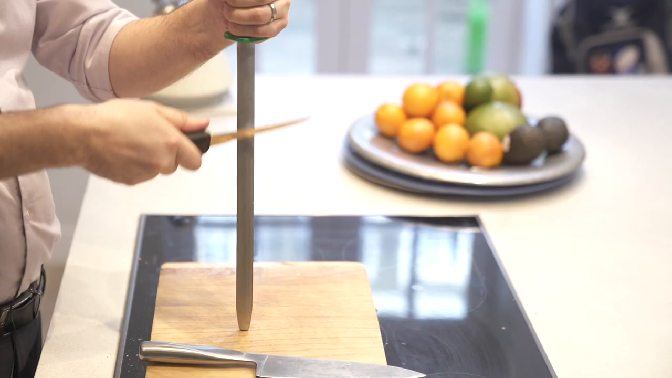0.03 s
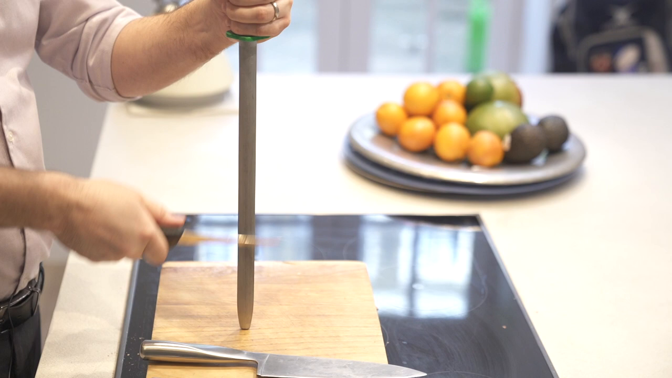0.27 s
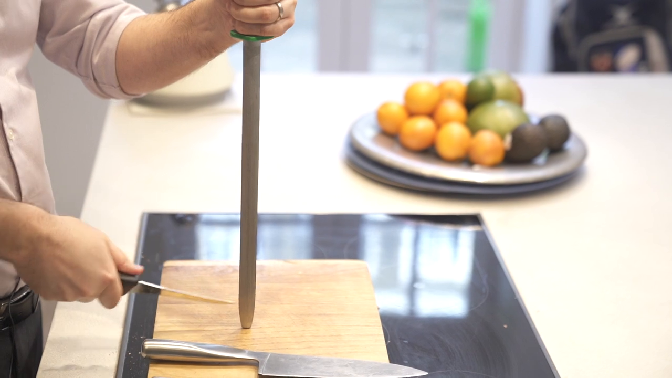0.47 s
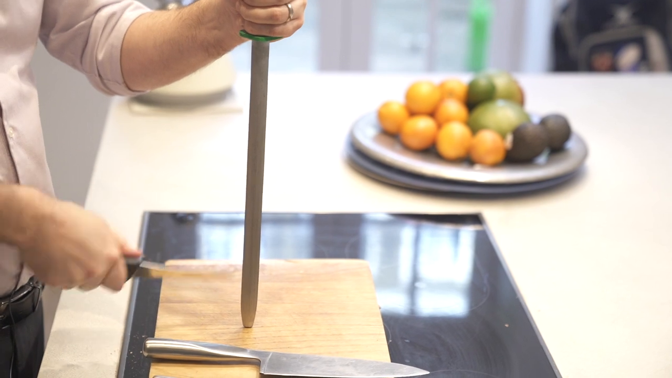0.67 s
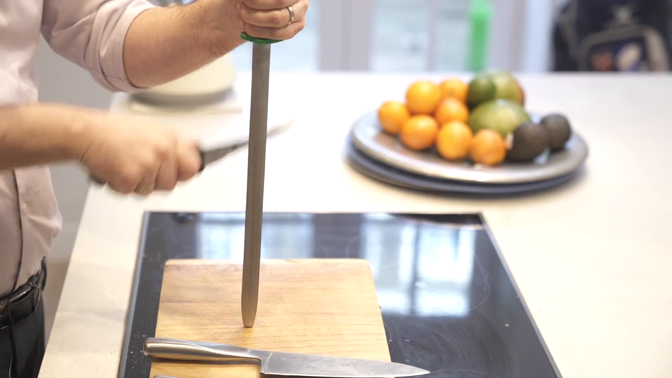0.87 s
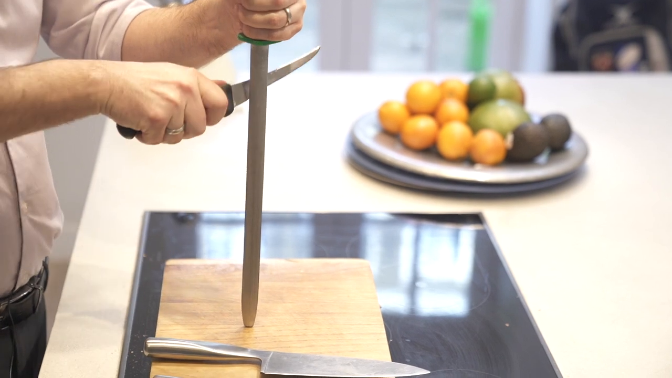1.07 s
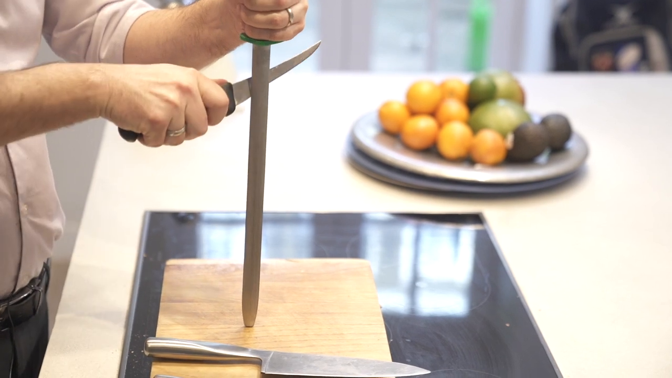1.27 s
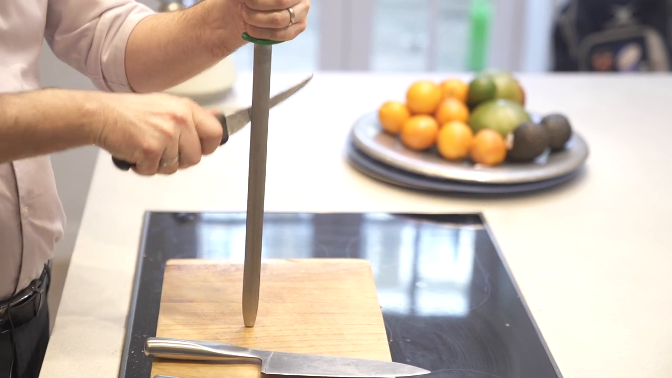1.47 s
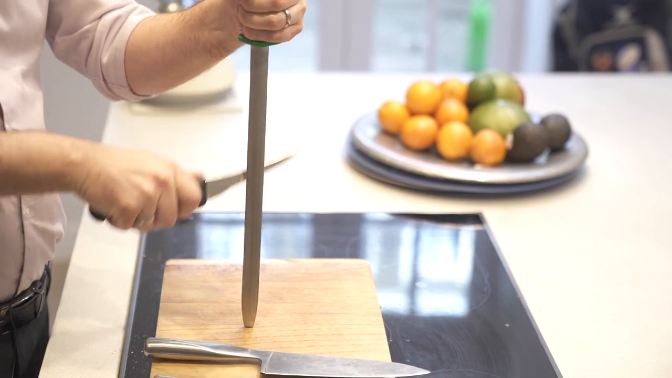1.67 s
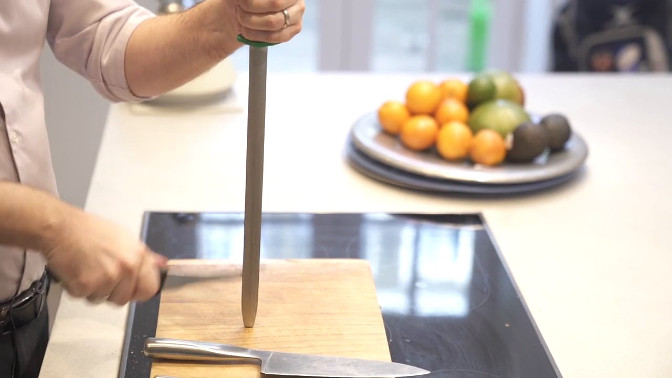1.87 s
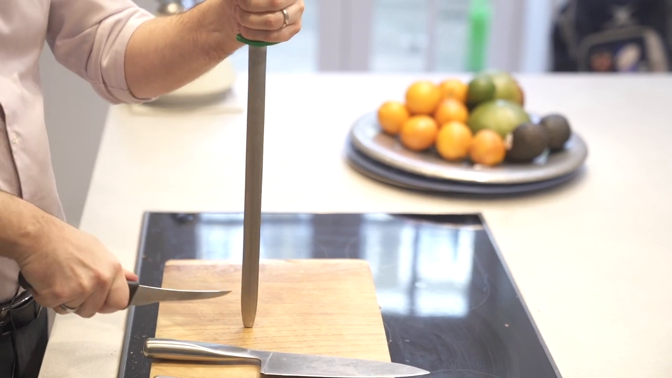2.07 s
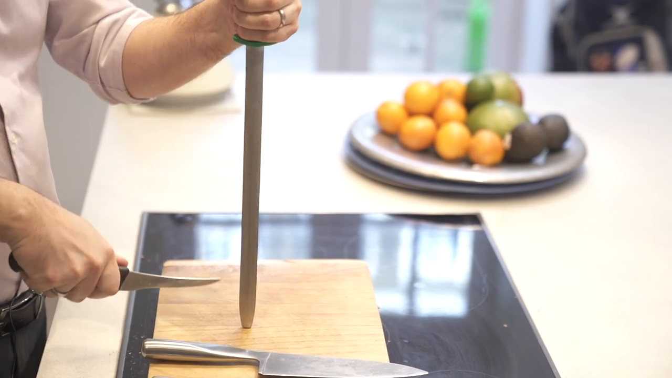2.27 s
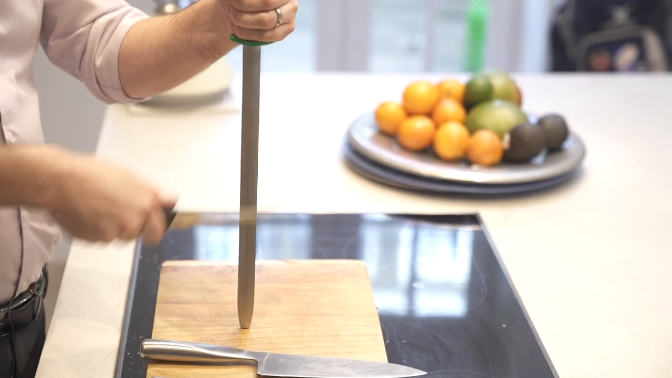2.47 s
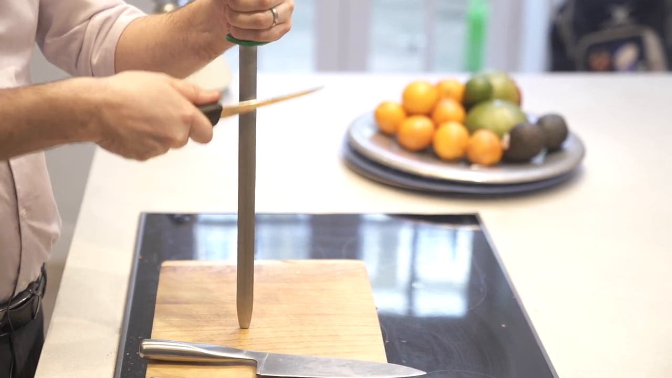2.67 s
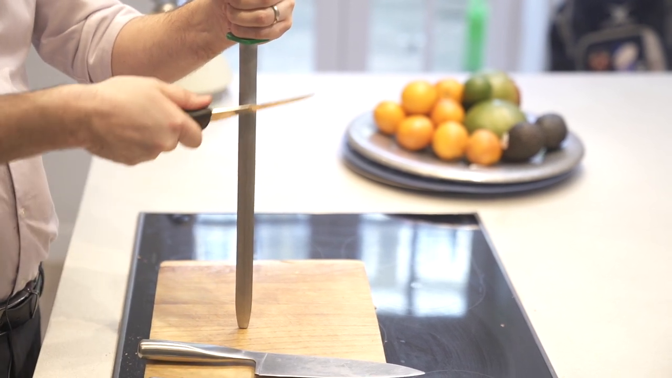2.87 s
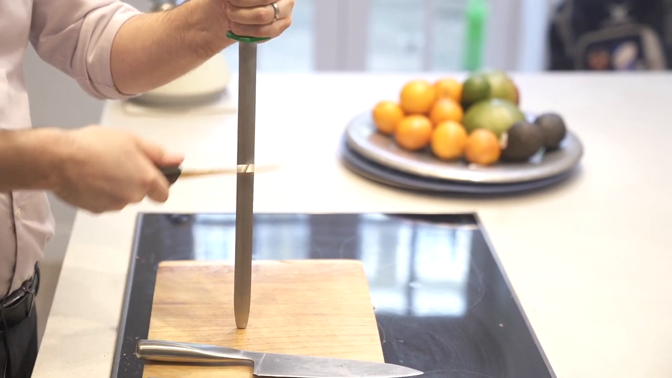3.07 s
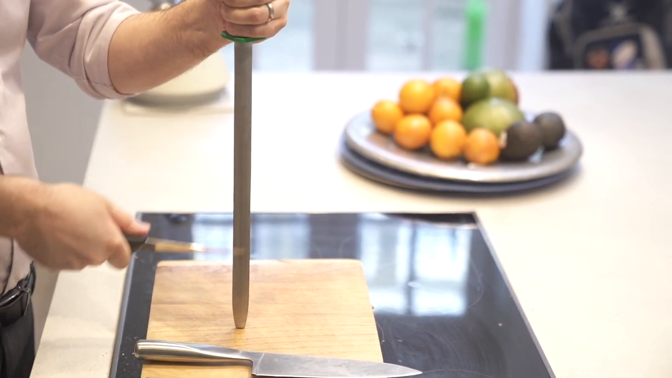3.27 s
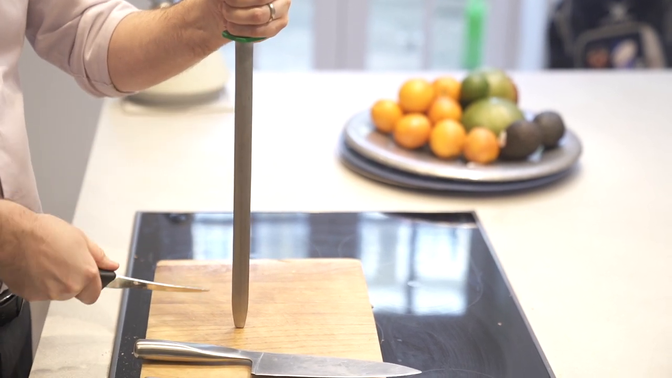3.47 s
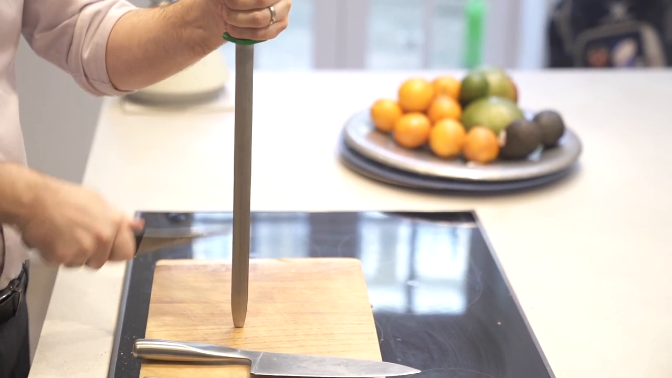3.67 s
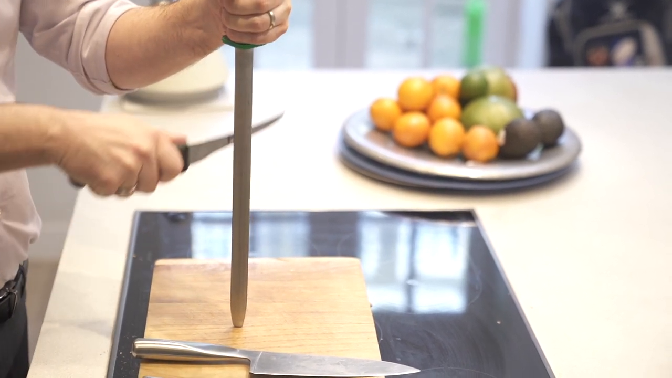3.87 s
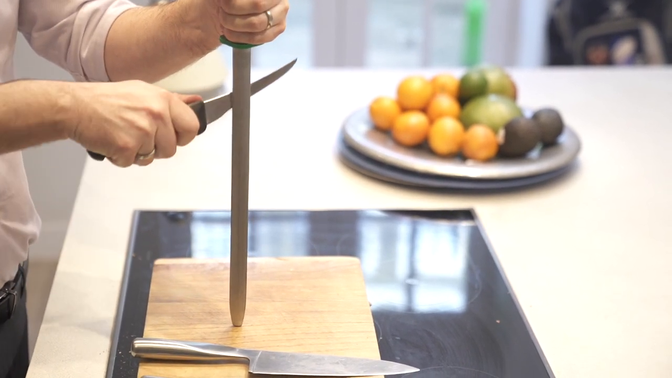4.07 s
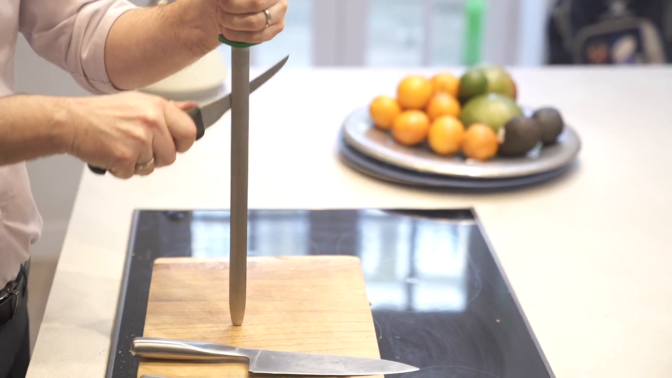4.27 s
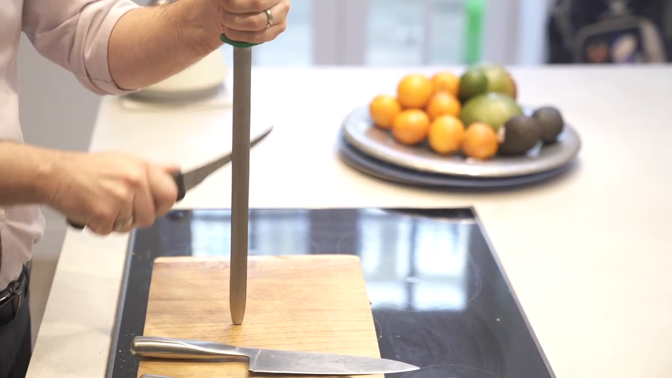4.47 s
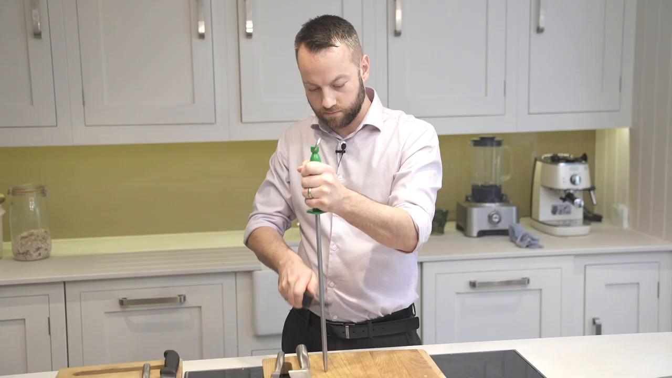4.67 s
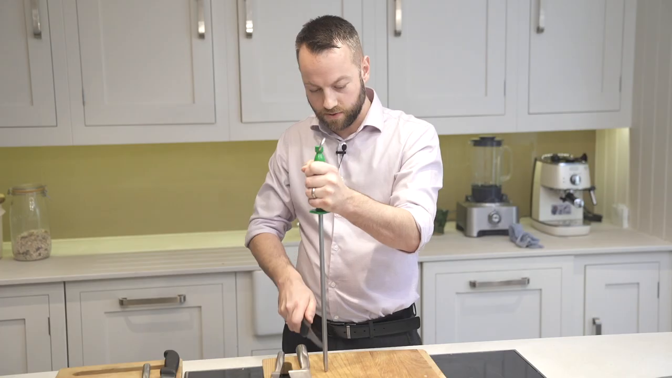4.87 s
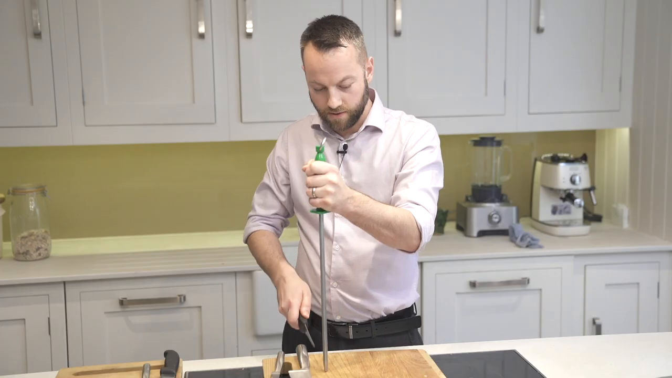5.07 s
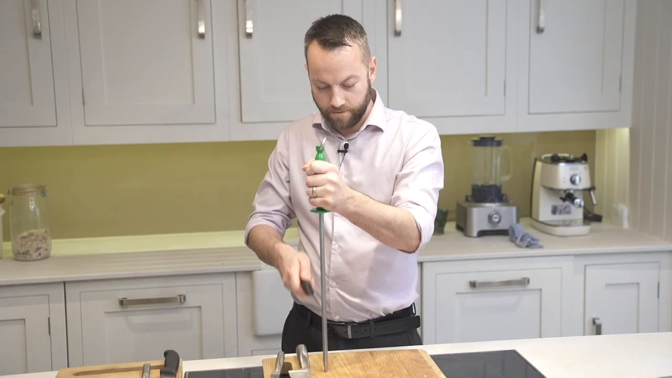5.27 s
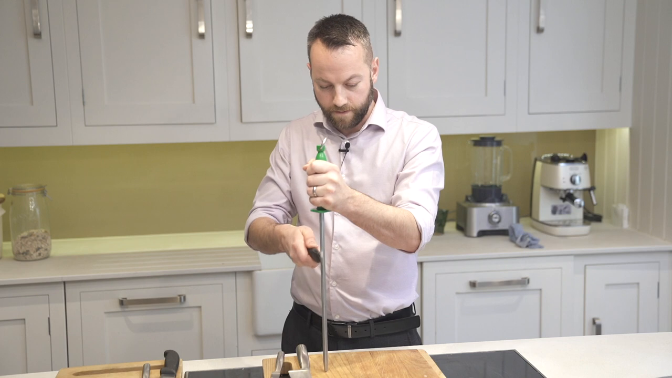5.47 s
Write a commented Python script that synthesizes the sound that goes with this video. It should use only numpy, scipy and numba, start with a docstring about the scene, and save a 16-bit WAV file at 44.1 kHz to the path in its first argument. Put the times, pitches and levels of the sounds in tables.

```python
"""A small knife is drawn down an upright honing steel, heel to tip, five times in a hard-walled kitchen.
Gritty noise rings the free end of the blade; its tones mostly climb as it shortens, then may sag.
They light up the fixed tones of the rod in passing; short touches, hiss and board rumble join in.
Echoes and filtered-noise room tone surround it, in stereo at first; after a fade nearly to silence
a single microphone with duller room tone takes over."""
import sys
import numpy as np
from scipy import signal
from scipy.fft import rfft, irfft
from scipy.io import wavfile
from scipy.ndimage import uniform_filter1d
from numba import njit

SR = 44100
rng = np.random.default_rng(int(sys.argv[2]) if len(sys.argv) > 2 else 0)


def dump_mix(stems):
    """Bounce the given channels to the path in sys.argv[1] as a 16-bit WAV at rate SR."""
    frames = np.atleast_2d(stems).T  # one column per channel
    limited = np.clip(frames, -1, 1)  # hard clip at full scale
    pcm = np.round(limited * 32767).astype(np.int16)
    wavfile.write(sys.argv[1], SR, pcm)


def volts_from_decibels(level):
    """Turn decibel levels (scalar or array-like) into linear amplitude factors."""
    exponent = np.asarray(level, float) / 20
    return 10 ** exponent


N = 243546
TIME = np.arange(N) / SR
RESTING_HZ = 800  # lowest blade tone off the steel, also the reference for tone widths


def knife():
    """Scrape and touches drive the blade; blade and contact together drive the rod."""
    scrape_db, lowest, (lowest_db, second_db, edge_db, board_db) = hand()
    low_change, second, second_change, board_change = along_blade(lowest)
    touching = board_db < 0
    second = np.where(touching, second, 2007)  # Hz when off the steel
    upper = 8.03 * lowest
    partner_db = -11.5 - 40 * (lowest < 1900)  # the partner tone shows only above this pitch
    # each tone: Hz, dB, width as a share of pitch
    tones = [(lowest, lowest_db + low_change, 0.034),
             (second, second_db + second_change, 0.017),
             (upper, -9.5, 0.067),
             (0.5 * upper, partner_db, 0.031)]

    scrape = grit(catch_db=2.1, catch_ms=1.2)
    contact = volts_from_decibels(1.5) * volts_from_decibels(scrape_db) * soften(scrape, upper)
    drive = contact + volts_from_decibels(3) * taps()
    ringing = volts_from_decibels(4.0) * blade(drive, tones, lowest) + volts_from_decibels(2.0) * rod(drive, tones)
    hiss = volts_from_decibels(scrape_db + edge_db) * edge_hiss(scrape)
    rumble = board(scrape, scrape_db, board_db + board_change) * touching
    mix = ringing + volts_from_decibels(-10.5) * drive + volts_from_decibels(-9.0) * hiss + volts_from_decibels(-12.0) * rumble
    return highs(mix, 451, order=2)


# The five strokes, heel to tip, one list per stroke.
# Each row: time in seconds, scrape level in dB before mixing, lowest blade tone in Hz.
STROKES = [
    [(.03, -66, 845), (.072, -53.5, 940), (.15, -46.5, 1190), (.2, -42, 1320), (.276, -39, 1580),
     (.362, -36, 2120), (.488, -42, 2600), (.62, -80, 3020)],
    [(1.186, -65, 720), (1.342, -64.5, 755), (1.42, -46, 800), (1.52, -38.5, 850), (1.62, -42, 1067),
     (1.7, -36.5, 1200), (1.78, -39, 1400), (1.87, -32, 2080), (1.93, -36.5, 3300), (2.08, -80, 3930)],
    [(2.725, -44, 818), (2.85, -55.5, 845), (2.9, -43, 930), (2.96, -40, 1180), (3.034, -38, 1350),
     (3.15, -36.5, 2000), (3.21, -35, 2570), (3.33, -38.5, 2730), (3.41, -41, 2250), (3.55, -72, 2100)],
    [(4.134, -58.5, 1133), (4.275, -66, 990), (4.31, -51, 1010), (4.34, -45, 1050), (4.4, -45.5, 1210),
     (4.512, -50, 1408), (4.61, -54.5, 1960), (4.68, -53.5, 2200), (4.7, -89, 2300)],
    [(4.72, -75, 900), (4.78, -62.5, 1230), (4.83, -59, 1000), (4.9, -56.5, 1267), (4.94, -69.5, 1000),
     (5.0, -100, 900)],
]
# How each stroke is held. Each row: basic levels in dB of the lowest tone, the second tone,
# the treble edge (counted from the scrape) and the board rumble.
HOLDS = [(-8, -2, -20, -87), (0.5, 2.5, -21, -56), (3, -4, -20.5, -56.5), (4, 1, -17, -57),
         (-5, 1.5, -11, -74)]


def hand():
    """Moves the knife: scrape level, lowest blade tone and hold at every sample."""
    level_db, pitch = np.full(N, -150.), np.full(N, float(RESTING_HZ))
    hold = np.zeros((4, N))
    hold[:2] = np.array([[-2], [10]])  # dB of the two lower tones off the steel
    for rows, held in zip(STROKES, HOLDS):
        s, row_db, row_hz = np.transpose(rows)
        on = (TIME >= s[0]) & (TIME < s[-1])
        level_db[on] = np.interp(TIME[on], s, row_db)
        pitch[on] = np.exp(np.interp(TIME[on], s, np.log(row_hz)))
        hold[:, on] = np.array(held)[:, None]
    return level_db, pitch, hold


# Along the blade the second tone clings to a rod tone, climbs, then drops back and sags.
# Each row: lowest tone in Hz, dB added to it, second tone in Hz, dB added to that,
# dB added to the board rumble.
BLADE_PLACES = [(720, 5.5, 2800, -17, 17.5), (840, 6, 3600, 3.5, 6.5), (1000, -0.5, 3730, 14.5, 4),
                (1191, -1.5, 3800, 8.5, -1.5), (1350, -2, 4840, 10, -1), (1632, -2.5, 6100, 2.5, -1),
                (2000, -4.5, 7430, 6.5, 1), (2250, -4, 6950, 3.5, -2.5), (2600, 1.5, 6370, 1.5, 0.5),
                (3300, -18, 6470, -5.5, -13)]


def along_blade(lowest):
    """The contact point, told by the lowest tone, sets the second tone and the balance."""
    place_hz, *changes = np.transpose(BLADE_PLACES)
    return [np.interp(lowest, place_hz, change) for change in changes]


def grit(catch_db, catch_ms):
    """Noise whose size jumps as the edge catches on the ridges of the steel."""
    k = max(int(catch_ms * SR / 1000), 1)
    catches = np.repeat(rng.exponential(size=N // k + 1), k)[:N]
    catches = uniform_filter1d(catches, k)
    return unit(rng.standard_normal(N) * volts_from_decibels(catch_db * catches))


def soften(scrape, upper):
    """A long overhang gives under the edge and swallows the treble above its upper tone."""
    top_hz = np.clip(1.142 * upper, 0, 17000)
    width = 1.44 * top_hz
    once = svf(scrape, top_hz, width)[1]
    return svf(once, top_hz, width)[1]


def blade(drive, tones, lowest):
    """The free end rings at four moving tones, which broaden as the pitch rises."""
    wide = (lowest / RESTING_HZ) ** 0.9
    return sum(volts_from_decibels(db) * ring(drive, hz, share * wide * hz) for hz, db, share in tones)


# Tones of the rod and handle. Each row: pitch in Hz, width in Hz, level in dB before mixing.
ROD_MODES = [(500, 33, -33.5), (847, 10, -3), (1200, 96, -16), (1780, 102, 2), (2200, 590, -11),
             (2570, 170, 1.5), (3530, 490, -8), (3734, 124, 2), (4236, 240, -7.5), (5110, 140, -1),
             (6140, 610, -5), (6990, 82, 2.5), (7320, 88, -4), (8850, 350, 0), (9850, 540, -7.5),
             (9930, 260, -13.5), (11800, 470, -36), (14980, 970, -8)]


def rod(drive, tones):
    """Fixed tones ring in the rod; those near a blade tone are pushed slightly harder."""
    nearby = sum(ring(drive, hz, 0.22 * hz) for hz, _, _ in tones[:3])
    push = drive + volts_from_decibels(-15.5) * nearby
    out = np.zeros(N)
    for k, (hz, width, db) in enumerate(ROD_MODES):
        out += (-1) ** k * volts_from_decibels(db) * ring(push, hz, width)  # signs alternate
    return out


# Short touches of the blade. Each row: start in seconds, level in dB before mixing,
# top of the contact sound in Hz, decay time in ms.
TOUCHES = [(1.188, -34, 8650, 4.2), (1.621, -34, 9000, 10.6), (2.204, -34.5, 2100, 6.4),
           (2.727, -23, 8800, 2.4), (3.398, -22.5, 11800, 2.5), (4.137, -33.5, 7800, 4.3),
           (4.21, -50, 2500, 6), (4.934, -53.5, 12000, 2.7)]


def taps():
    """Each touch is a short burst of noise with its own brightness and decay."""
    out, t = np.zeros(N), TIME[:4096]
    for s, db, top_hz, ms in TOUCHES:
        noise = rng.standard_normal(len(t))
        burst = noise * np.exp(-t * 1000 / ms) * (1 - np.exp(-t / 0.0007))
        low_pass = signal.butter(2, top_hz, fs=SR, output="sos")
        out[int(s * SR):][:len(t)] += volts_from_decibels(db) * signal.sosfilt(low_pass, burst)
    return out


def edge_hiss(scrape):
    """The grit also hisses in a broad treble band."""
    return unit(ring(scrape, 13500, 5000))


def board(scrape, scrape_db, board_db):
    """Two broad low resonances turn the grit into a rumble that follows the scrape only partly."""
    rumble = unit(ring(ring(scrape, 320, 410), 440, 360))
    return volts_from_decibels(board_db + 0.44 * (scrape_db + 47.5)) * rumble


def walls(x, count):
    """Dense echoes (two unrelated sets), treble dying first; the paths change as the hands move."""
    t = TIME[:SR // 2]
    noise = rng.standard_normal((count, 2, len(t)))
    above_low, above_high = highs(noise, 1400, order=2), highs(noise, 5320, order=2)
    bands = noise - above_low, above_low - above_high, above_high
    t60_s = 0.51, 0.41, 0.29  # seconds to fall 60 dB: bass, middle, treble
    paths = sum(band * volts_from_decibels(-60 * t / fall) for band, fall in zip(bands, t60_s))
    paths *= np.clip(t / 0.0075, 0, 1)  # the echoes build up
    paths /= np.sqrt(np.sum(paths ** 2, axis=2, keepdims=True))
    out = 0
    for k, path in enumerate(paths):
        # each path swells and fades in turn, once every 0.896 s
        place = np.cos(np.pi * (TIME / 0.896 - k / count)) ** 4
        out = out + signal.fftconvolve([x * place], path, axes=1)[:, :N]
    return volts_from_decibels(-0.5) * out


# Spectrum of the room tone in the stereo microphone. Each row: pitch in Hz, relative level in dB.
WIDE_SPECTRUM = [(15, -34), (25, -9.5), (59, 2), (240, -4), (410, -9), (648, -9), (848, -12.5),
                 (919, -12.5), (1170, -15), (8350, -24), (15500, -28.5)]
# The same for the single, close microphone. Each row: pitch in Hz, relative level in dB.
CLOSE_SPECTRUM = [(15, -30), (25, -6), (221, -22), (421, -18.5), (631, -25.5), (684, -23), (2170, -27.5),
                  (2630, -35.5), (15500, -55.5)]


def room_tone():
    """Steady air and appliance noise, faded: wide microphone (mid, side) and close microphone."""
    mid, side = coloured(WIDE_SPECTRUM), coloured(WIDE_SPECTRUM)
    wide_gain = volts_from_decibels(-63) * ramp(.02, 0.69, 1.2) * ramp(4.722, -0.42, 1.07)
    wide = wide_gain * np.array([mid, side]) / np.std(mid)
    # the close tone is heard for an instant at the opening, then again near the end
    close_gain = volts_from_decibels(-54) * ramp(0.027, -0.041, 1.7) + volts_from_decibels(-62.5) * ramp(4.676, 0.47, 1.52)
    return wide, close_gain * unit(coloured(CLOSE_SPECTRUM))


def coloured(points):
    """Noise with a (Hz, dB) spectrum."""
    hz, db = np.transpose(points)
    bins = np.maximum(np.arange(N // 2 + 1) * SR / N, 1)
    gain = volts_from_decibels(np.interp(np.log(bins), np.log(hz), db))
    return irfft(rfft(rng.standard_normal(N)) * gain, N)


def ramp(s, length_s, power):
    """Gain rising from 0 at s to 1 a length later (earlier, if the length is negative)."""
    return np.clip((TIME - s) / length_s, 0, 1) ** power


def unit(x):
    """Scale to rms 1."""
    return x / np.sqrt(np.mean(x ** 2))


def highs(x, hz, order):
    """High-pass: keeps what lies above hz."""
    return signal.sosfilt(signal.butter(order, hz, "high", fs=SR, output="sos"), x)


def ring(x, hz, width):
    """A resonance whose peak height does not depend on its width."""
    hz = np.clip(hz + np.zeros(N), 50, 19000)
    return svf(x, hz, width + np.zeros(N))[0]


@njit
def svf(x, hz, width):
    """State-variable filter with moving centre: (band, low)."""
    band, low, b, l = np.empty(len(x)), np.empty(len(x)), 0., 0.
    for i in range(len(x)):
        g, k = np.tan(np.pi * hz[i] / SR), width[i] / hz[i]
        v = (b + g * (x[i] + 1e-18 - l)) / (1 + g * (g + k))
        low[i] = l + g * v
        b, l, band[i] = 2 * v - b, 2 * low[i] - l, k * v
    return band, low


def scene():
    """Each microphone hears only its own part of the strokes, direct and off the kitchen walls."""
    cut_s = 4.705
    steel = knife()
    first = TIME < cut_s
    near, far = walls(steel * first, count=4), walls(steel * ~first, count=4)
    wide, close = room_tone()
    fade = np.clip((cut_s - TIME) / 0.1, 0, 1)
    mid = (steel * first + near[0]) * fade + wide[0]
    # the two ports sit close together: long waves reach both alike
    side = highs(volts_from_decibels(0.5) * near[1] * fade + volts_from_decibels(1.5) * wide[1], 750, order=1)
    side = side + volts_from_decibels(-9.5) * highs(side, 8000, order=2)
    stereo = volts_from_decibels(np.array([[-.7], [.7]])) * np.array([mid + side, mid - side])
    single = steel * ~first + volts_from_decibels(-3) * far[0] + close
    return stereo + single


def top_cut(x):
    """Nothing passes above the cut-off."""
    return signal.sosfilt(signal.butter(12, 16270, fs=SR, output="sos"), x)


def record(dry):
    """The microphone drops the deepest bass; a steep low-pass removes the extreme treble."""
    top = signal.ellip(10, .2, 80, 15780, fs=SR, output="sos")
    mix = signal.sosfilt(top, highs(dry, 26, order=2))
    return top_cut(mix)


dry = scene()
out = record(dry)
dump_mix(out)
```